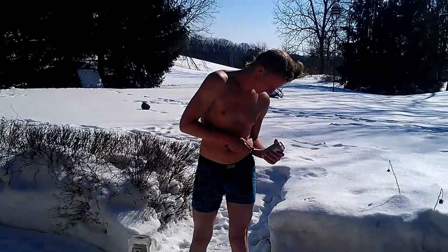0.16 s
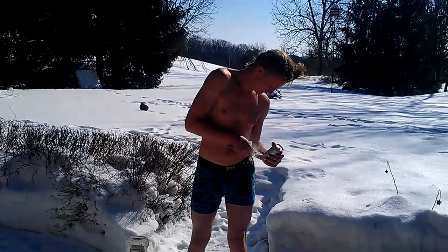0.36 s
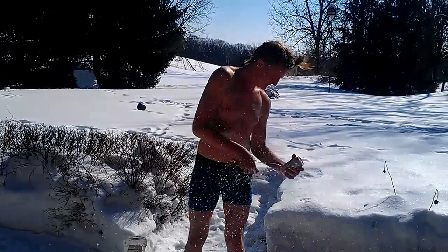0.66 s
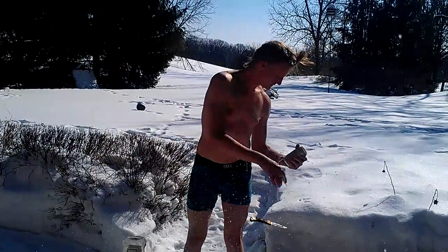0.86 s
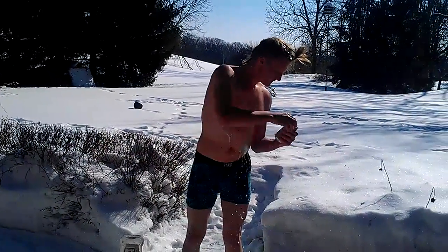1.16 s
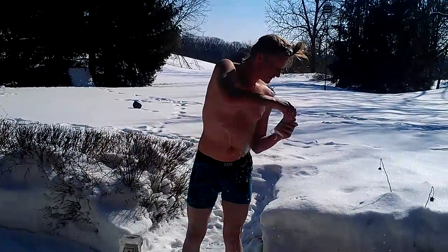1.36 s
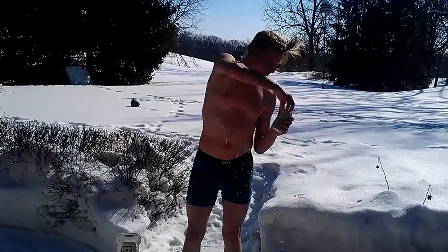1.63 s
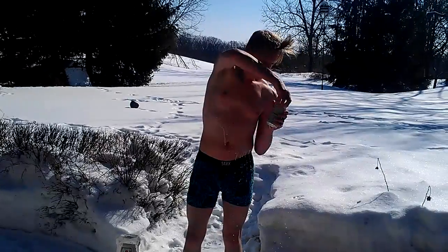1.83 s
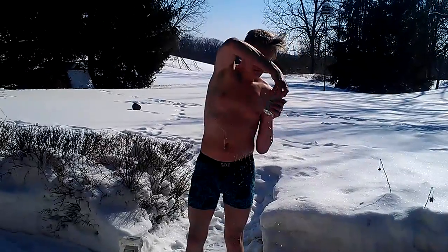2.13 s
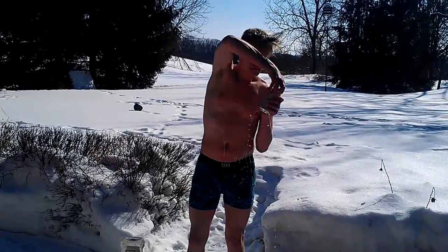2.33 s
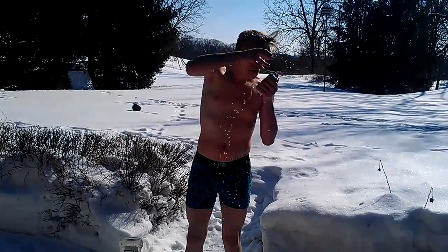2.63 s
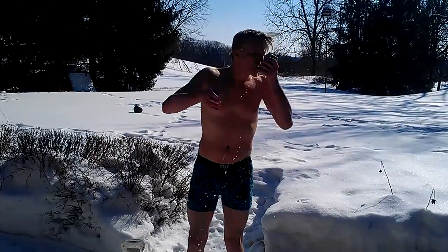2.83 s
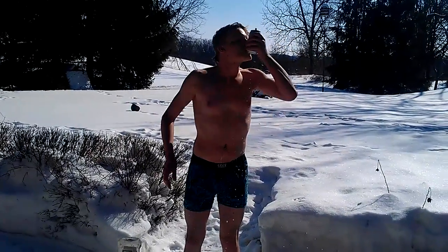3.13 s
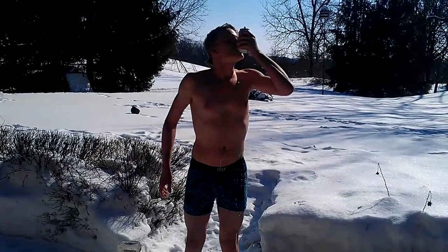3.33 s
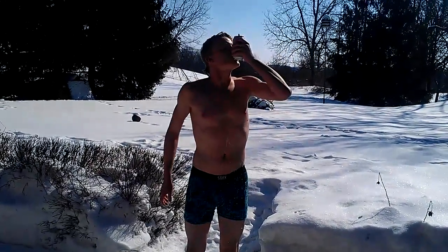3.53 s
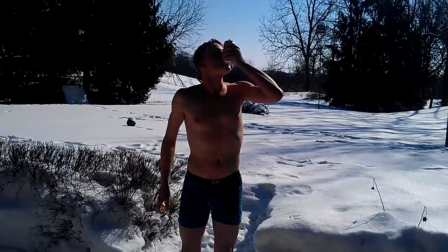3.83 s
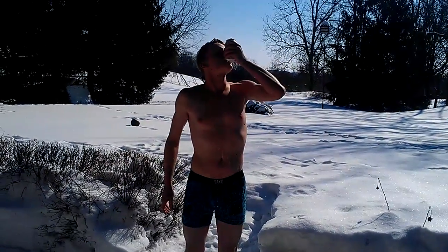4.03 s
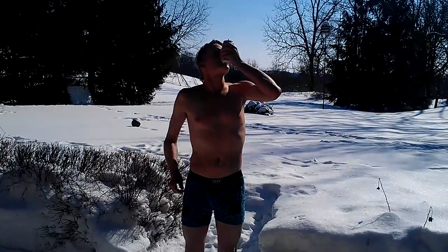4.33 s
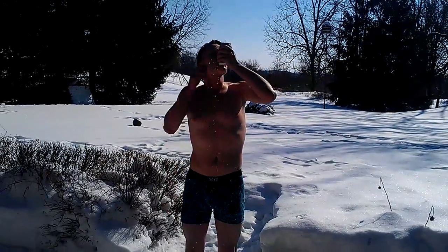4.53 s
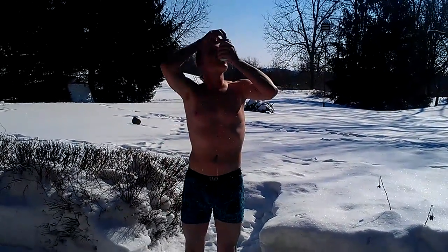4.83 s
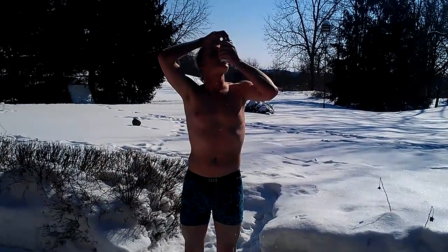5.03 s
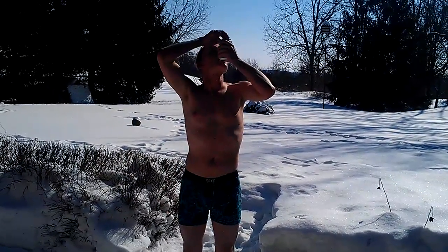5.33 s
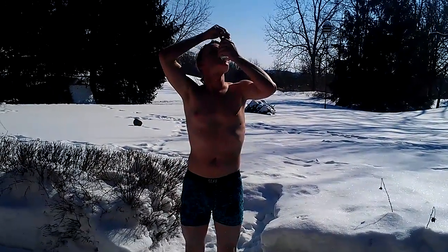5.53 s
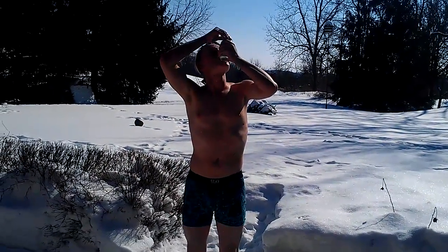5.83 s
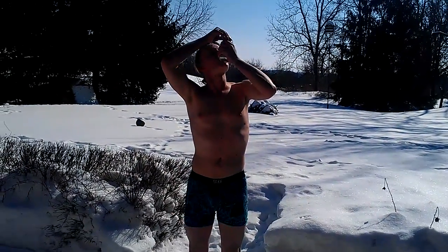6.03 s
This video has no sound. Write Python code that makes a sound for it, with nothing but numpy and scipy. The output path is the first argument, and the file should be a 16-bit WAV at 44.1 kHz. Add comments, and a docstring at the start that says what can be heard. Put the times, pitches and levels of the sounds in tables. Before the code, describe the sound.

Outdoors in the snow, meltwater splatters unevenly in a nearby metal downpipe, making it ring faintly. A drink can is pierced and spurts with two short hisses, and drops tick. Then the tab cracks open with a loud snap of gas, a brief fizz and two quick gulps of air. The thin metal creaks a few more times as it is handled. Light wind puffs against the microphone over a faint distant hum.

```python
"""Meltwater splatters in a metal downpipe close by and makes it ring, outdoors in the snow.
A drink can is pierced: its jet hisses, drops tick, and the thin wall creaks as it is handled.
Then the tab cracks open with a snap of escaping gas, and air gulps through the opening.
Light wind puffs against the microphone, and a dull hum lies far behind it all."""
import sys
import numpy as np
from scipy import signal
from scipy.fft import rfft, irfft
from scipy.io import wavfile

SR = 44100
rng = np.random.default_rng(int(sys.argv[2]) if len(sys.argv) > 2 else 0)


def store_wav(level_fs):
    """Save 16-bit WAV to argv[1]."""
    pcm = np.round(np.clip(np.atleast_2d(level_fs), -1, 1) * 32767)
    wavfile.write(sys.argv[1], SR, pcm.T.astype(np.int16))


N = 272097

# The notes the can rings at. Each row: pitch in Hz, width in Hz, level in dB.
CAN_NOTES = [(700, 100, 3.5), (850, 160, -3), (1210, 200, -11), (2035, 120, -4), (2185, 90, -4),
             (2750, 200, -10), (3160, 150, -6), (3500, 150, -6), (3880, 170, 1), (4240, 150, -3),
             (4570, 200, -9), (5700, 600, -15), (8700, 900, -16)]
# The tone of the escaping gas. Each row: frequency in Hz, level in dB.
SNAP_TONE = [(35, -45), (60, -27), (110, -32.5), (300, -11), (600, -11), (1500, -0.5), (2500, 1.5),
             (4500, -8.5), (6500, -12), (8800, -8), (12000, -13), (16000, -37)]
def can_snap(start_s=2.3848, rise_s=0.0017, hold_s=0.013):
    """The lid lets go with one kick; gas bursts out, rings the can and fades to a short sigh."""
    t = np.arange(N) / SR - start_s
    burst_db = -8.5 - 33 * (np.maximum(t - hold_s, 0) / .04) ** 1.3   # fades ever faster
    sigh_db = -42.5 - 600 * np.maximum(t - 0.1, 0)
    strength = np.clip(t / rise_s, 0, 1) * from_db(np.maximum(burst_db, sigh_db).clip(min=-200))
    gas = rng.standard_normal(N)
    burst = gas * strength
    burst[round(start_s * SR)] += from_db(18.5)   # the kick
    ringing = ring(burst, CAN_NOTES) / np.std(ring(gas, CAN_NOTES))
    rush = strength * coloured(rng.standard_normal(N), SNAP_TONE)
    return ringing + from_db(-5) * rush


# Creaks of the can. Each row: start in seconds, peak level in dB, seconds for the scrape to fade 60 dB,
# brightness in dB per octave, pitch of the bending metal in Hz.
CREAKS = [(0.386, -37, .09, 2, 2000), (1.1685, -29, 0.17, -6, 5200), (2.1384, -20, 0.17, 0, 3940),
          (2.348, -20, 0.52, 8.5, 4980), (2.497, -21.5, 0.12, -18.5, 3460),
          (2.5687, -23.5, 0.062, -4, 3000), (3.29, -32.5, 0.29, -47, 2000), (3.4047, -32.5, 0.049, 1, 3370),
          (3.4496, -39, .06, 10, 4230), (3.5407, -33, 0.066, 7, 3200), (5.226, -31, 0.12, 0, 3080),
          (5.4906, -19, 0.084, -3, 3240), (5.4982, -24, 0.12, -13, 2860)]
def can_creaks():
    """The wall and tab buckle: a crack and a short scrape ring the can's higher notes."""
    out, t = np.zeros(N), np.arange(SR // 5) / SR
    for s, db, fade_s, bright_db, hz in CREAKS:
        crack = from_db(5.5 - 60 * t / 0.0041)
        scrape = rng.standard_normal(len(t)) * (crack + from_db(-60 * t / fade_s))
        hit = ring(scrape, CAN_NOTES[3:], bright_db)
        hit += from_db(-13.5 + 0.43 * bright_db) * resonance(scrape, 4300, 3800)
        hit += from_db(-28 + 1.4 * bright_db) * resonance(scrape, 14000, 7000)   # the crack's sharp edge
        hit += from_db(4.5) * resonance(scrape, hz, 200)
        dull = signal.lfilter([.45], [1, -.55], hit)
        hit = dull + hit * from_db(-60 * t / 0.018)   # the highest notes die first
        add(out, s, from_db(db) * hit / np.abs(hit).max())
    return out


# Gulps of air. Each row: time in seconds, level in dB, pitch in Hz, rise and fall times in seconds.
AIR_GULPS = [(2.502, -31, 770, 0.0035, 0.0076), (2.577, -17, 789, 0.0024, 0.0053)]
def air_gulps():
    """Air gulps through the opening at the pitch of the air inside; liquid roughens the note."""
    out, t = np.zeros(N), np.arange(SR // 5) / SR - .04
    slosh = from_db(-11) * rms_one(resonance(rng.standard_normal(len(t)), 830, 140))
    for s, db, hz, rise_s, fall_s in AIR_GULPS:
        swell = 2 / (np.exp(-t / rise_s) + np.exp(t / fall_s))
        note = np.sin(2 * np.pi * hz * t)
        add(out, s + t[0], from_db(db) * swell * (note + slosh))
    return out


# Jets of foam and gas, one list for each. Each row: time in seconds, relative level in dB.
JETS = [
    [(.378, -68), (.400, -47), (.405, -32.5), (.432, -28.5), (.47, -38), (.53, -43), (.62, -53.5),
     (.64, -46), (.69, -71), (.72, -95)],
    [(.72, -77), (.9, -72), (1.02, -64), (1.07, -49.5), (1.13, -55.5), (1.164, -57), (1.168, -33.5),
     (1.178, -28), (1.205, -63), (1.28, -66), (1.55, -73), (1.75, -72), (2.0, -79), (2.3, -79)],
    [(2.43, -31), (2.445, -43), (2.49, -56), (2.53, -78), (2.62, -92), (2.8, -67), (3.0, -62), (3.2, -79),
     (3.45, -69.5), (3.7, -67), (3.9, -103.5)],
]
# The tone of their hiss. Each row: frequency in Hz, level in dB.
JET_TONE = [(410, -44), (700, -12), (946, -0.5), (1110, -9.5), (2130, -6.5), (2460, -12), (4260, -1.5),
            (6740, -8), (9730, -5.5), (16000, -18.5)]
def spray(spits_per_s=350, split_hz=2900):
    """The jet hisses and bubbles burst in it; the sound thins out as the jet weakens."""
    hiss = coloured(rng.standard_normal(N), JET_TONE) * from_db(2.1 * drift(200) + 0.93 * drift(9.1))
    spits = (rng.random(N) < spits_per_s / SR) * rng.standard_normal(N)
    spits *= from_db(7.9 * rng.exponential(1, N).clip(0, 4))   # a few are much louder
    hiss += from_db(-9) * rms_one(resonance(spits + 1e-18, 6000, 6000))
    jet, thin_jet = sum(level(rows) for rows in JETS), from_db(-56.5)
    treble_gain = thin_jet * (jet / thin_jet) ** 0.73   # follows the jet only in part
    low, high = filtered(hiss, split_hz, "low"), filtered(hiss, split_hz, "high")
    return from_db(-1.5) * (low * jet - high * treble_gain)


# Froth in the opened can. Each row: time in seconds, level in dB.
FROTH_LEVELS = [(2.43, -58), (2.45, -44), (2.5, -47), (2.6, -74), (2.75, -65), (2.85, -76)]
def froth():
    """Rising froth makes a duller, uneven fizz."""
    fizz = rng.standard_normal(N) * from_db(3 * drift(300))
    return level(FROTH_LEVELS) * rms_one(resonance(resonance(fizz, 2100, 3000), 2100, 3000))


# The clearest drops. Each row: start in seconds, relative level in dB.
DROPS = [(1.065, -46), (1.1273, -38), (1.3404, -41), (1.4935, -44), (1.5407, -40), (1.5586, -39),
         (1.5948, -45), (1.9714, -41.5), (1.9844, -37), (1.9944, -37.5), (2.0367, -49), (2.0692, -50),
         (2.317, -41), (2.7192, -44), (2.82, -45), (2.8897, -35), (2.9344, -38), (2.9793, -40),
         (2.9994, -40), (3.0355, -41), (3.0839, -45), (3.6506, -47), (3.6883, -36.5), (3.991, -36),
         (5.3547, -44)]
def drops(leak_start_s=1.3, leak_end_s=3.8):
    """Falling drops tick, each at a random high pitch; fainter ones join in while the can leaks."""
    out, t = np.zeros(N), np.arange(SR // 20) / SR
    faint = [(s, -51.5 + 4.5 * chance) for s, chance in scattered(leak_start_s, leak_end_s, count=24)]
    for s, db in DROPS + faint:
        hz = 5500 * np.exp(0.29 * rng.standard_normal())
        tap = rng.standard_normal(len(t)) * from_db(-60 * t / 0.011)
        tick = resonance(resonance(tap, hz, 1.1 * hz), hz, 1.1 * hz)
        add(out, s, from_db(db - 2.0) * tick / np.abs(tick).max())
    return out


# The clearest splashes. Each row: start in seconds, relative level in dB, extra treble in dB,
# hold in seconds before water_flow shortens it.
SPLASHES = [(0.0004, -32, -22, 0.059), (0.0453, -31, -24, 0.061), (0.196, -39.5, -21, .035),
            (0.2302, -23.5, -7, 0.052), (0.3836, -40, -5, .11), (0.731, -36, -9, 0.033),
            (0.9015, -30.5, 3.5, 0.061), (1.047, -38, -21, 0.032), (1.1242, -38, -2, 0.013),
            (1.209, -38, 2, 0.036), (1.2944, -43, 3, .03), (1.3854, -34.5, -2.5, 0.041),
            (1.4174, -33, -2.5, .04), (1.4915, -43.5, 3, 0.024), (1.5354, -54.5, 8, 0.043),
            (1.637, -40.5, 0, 0.058), (1.696, -34, -7.5, 0.009), (1.841, -47, -2, 0.076),
            (2.028, -47, 5.5, 0.02), (2.102, -45, -11, 0.1), (2.178, -35, -6, .05),
            (2.3283, -32.5, -6, 0.11), (2.447, -33.5, 4, 0.11), (2.673, -33, -22, 0.082),
            (2.9784, -31, -6, .005), (3.085, -47, 8.5, 0.14), (3.1616, -35.5, -9, 0.096),
            (3.289, -32.5, -3.5, .06), (3.4025, -33.5, -0.5, 0.039), (3.449, -31.5, -4.5, 0.11),
            (3.537, -31, 0, 0.068), (3.722, -36.5, -4, 0.049), (3.85, -42, -5, .025),
            (3.9865, -36, -8.5, 0.12), (4.114, -39, -4, 0.098), (4.2504, -34, -4, 0.073),
            (4.33, -34, -7, 0.026), (4.396, -33, -7, 0.085), (4.4505, -36, -4.5, 0.078),
            (4.563, -38, -6.5, 0.066), (4.663, -39.5, -6, 0.043), (4.7999, -40, -6.5, 0.13),
            (4.9024, -37.5, -8, .03), (4.941, -38.5, -5, 0.078), (5.1163, -33.5, -11, 0.1),
            (5.222, -34, 0, 0.084), (5.3847, -37, -16, 0.074), (5.4346, -34.5, -3.5, 0.017),
            (5.529, -32, -5, 0.067), (5.61, -36.5, -1.5, 0.14), (5.7123, -40, -3.5, 0.021),
            (5.8225, -37.5, -6.5, 0.056), (5.897, -34.5, -6.5, 0.072), (6.0195, -37.5, -14, .06)]
# The steady run of water. Each row: time in seconds, level in dB.
TRICKLE_LEVELS = [(0.0, -47.5), (0.2, -57), (0.8, -60), (1.2, -52), (1.5, -63), (2.25, -57), (2.56, -45.5),
                  (2.8, -52.5), (4.3, -59), (5.05, -62.5), (5.55, -50), (5.8, -64.5), (6.17, -56.5)]
# The lower and the higher part of the splash's tone. Each row: frequency in Hz, level in dB.
PIPE_LOW_TONE = [(900, -26.5), (1150, -7.5), (1260, 3), (1700, 0), (2500, -5.5), (2800, -14.5), (4000, -9),
                 (7000, -52)]
PIPE_HIGH_TONE = [(2000, -30), (2800, -2), (3500, 1), (4300, -6.5), (4700, -5), (6400, -13), (7000, -30),
                  (11000, -26), (15500, -40.5)]
# The notes the pipe rings at. Each row: pitch in Hz, width in Hz, level in dB.
PIPE_NOTES = [(1261, 12, 0), (1400, 47, -10), (1500, 100, -15), (1652, 16, 4.5), (2159, 11, -1),
              (2287, 47, -7), (2520, 35, -7), (3160, 35, -5.5), (3990, 5, -11)]
def downpipe():
    """Lumps of water burst into droplets; the pipe rings and holds back sound below its lowest note."""
    dribbles = [(s, -43 + 2.5 * chance, -1.5, 0.032) for s, chance in scattered(0, N / SR, count=24)]
    s, db, treble_db, hold = np.transpose(SPLASHES + dribbles)
    trickle = level(TRICKLE_LEVELS)
    low = water_flow(trickle, s, db - 15.5, hold, time_scale=0.66)
    # High notes leave the pipe first.
    high = water_flow(from_db(-5) * trickle, s, db + treble_db - 14.0, hold, time_scale=0.4)
    droplets = rng.standard_normal((2, N)) * from_db(2.4 * drift(400))
    splash = low * coloured(droplets[0], PIPE_LOW_TONE) + high * coloured(droplets[1], PIPE_HIGH_TONE)
    ringing = ring(low * droplets[1], PIPE_NOTES) / np.std(ring(droplets[1], PIPE_NOTES))
    return splash + from_db(0.5) * ringing


def water_flow(trickle, times, levels_db, holds, time_scale):
    """Loudness over time: each lump of water lands with a blow, holds, then thins out to the trickle."""
    t, power = np.arange(SR // 2) / SR, trickle ** 2
    blow = 1 + from_db(-5.5 - 60 * t / 0.084)
    for s, db, hold in zip(times, levels_db, holds):
        fade_db = 60 * np.maximum(t - time_scale * hold, 0) / (time_scale * .28)
        add(power, s, (blow * from_db(db - fade_db)) ** 2)
    return np.sqrt(power)


# Gusts of wind. Each row: time in seconds, relative level in dB.
GUSTS = [(0.0, -49.5), (0.06, -44), (0.17, -52.5), (0.4, -55.5), (0.54, -50), (0.67, -63), (0.8, -88),
         (0.92, -61), (1.06, -48.5), (1.2, -46), (1.27, -52.5), (1.34, -41.5), (1.4, -42.5), (1.47, -58.5),
         (1.69, -50), (1.85, -51.5), (1.92, -75), (2.4, -69), (2.5, -57), (2.56, -34.5), (2.7, -43),
         (2.82, -56), (2.87, -47), (3.16, -54), (3.24, -43.5), (3.42, -49.5), (3.51, -35), (3.55, -59),
         (3.76, -60), (3.92, -52), (4.05, -59), (4.3, -65.5), (5.1, -78), (5.45, -63), (5.8, -81),
         (5.92, -55.5), (6.17, -84)]
# The tone of the gusts. Each row: frequency in Hz, level in dB.
GUST_TONE = [(24, -63), (40, -35), (254, -1.5), (504, -7), (633, -12), (877, -5.5), (1090, -26.5),
             (1200, -32.5), (1560, -49), (2640, -120)]
# The strongest puffs. Each row: time of the peak in seconds, relative level in dB, pitch in Hz.
PUFFS = [(0.0617, -33, 420), (0.1788, -31.5, 328), (0.2641, -32, 520), (0.5098, -31, 430),
         (0.5373, -29.5, 415), (1.0619, -27, 338), (1.122, -33, 366), (1.164, -26.5, 355),
         (1.1767, -21.5, 860), (1.1897, -26, 395), (1.3319, -26, 346), (1.343, -23, 560),
         (1.3596, -28, 351), (1.3875, -13.5, 740), (1.399, -25.5, 347), (1.5858, -33.5, 364),
         (1.6405, -29.5, 510), (1.676, -28, 377), (1.6898, -29.5, 360), (1.7765, -26, 403),
         (1.818, -33.5, 400), (1.8423, -30.5, 373), (2.563, -20, 490), (2.6189, -18, 510),
         (2.652, -24, 355), (2.679, -25, 320), (2.6909, -23, 496), (2.8609, -28.5, 660), (2.877, -32, 590),
         (2.9746, -28, 960), (2.9846, -30, 790), (3.2027, -28, 397), (3.2328, -25, 357),
         (3.2923, -27.5, 790), (3.3686, -31, 672), (3.4376, -23.5, 384), (3.482, -21, 550),
         (3.5068, -18, 383), (3.66, -44.5, 260), (3.72, -43, 300), (3.9196, -36, 332), (3.94, -36, 260),
         (5.015, -55, 200), (5.03, -50, 256), (5.18, -39, 454), (5.285, -54, 230), (5.435, -41.5, 350),
         (5.457, -43.5, 264), (5.55, -43, 242), (5.925, -44, 300)]
def wind(swirl_hz=410, roughness=0.22):
    """Gusts make a lumpy, low noise; each swirl that hits the microphone is a puff sinking in pitch."""
    lumps = rms_one(rng.standard_normal(N) * from_db(4.0 * drift(46)))
    out = from_db(-1.0) * level(GUSTS) * coloured(lumps, GUST_TONE)
    t = (np.arange(SR // 25) - SR // 50) / SR
    puffs = list(PUFFS)
    for s, chance in scattered(0, N / SR, count=110):   # weaker puffs that follow the gusts
        gust_db = np.interp(s, *np.transpose(GUSTS))
        puffs.append((s, gust_db + 2.5 + 0.5 * chance, swirl_hz * np.exp(.2 * rng.standard_normal())))
    for (s, db, hz), phase in zip(puffs, rng.random(len(puffs))):
        cycles = t * hz
        swell = np.exp(-(cycles / np.where(t < 0, .8, 1.3)) ** 2)
        note = np.sin(2 * np.pi * (cycles - 0.11 * cycles ** 2 + phase))
        flutter = rms_one(filtered(rng.standard_normal(len(t)), [hz / 2, 2 * hz], "band", order=4))
        add(out, s + t[0], from_db(db - 4.0) * swell * (note + roughness * flutter))
    return out


# The tone of the background. Each row: frequency in Hz, level in dB.
HUM_TONE = [(60, -49.5), (120, -36.5), (250, -8.5), (450, 1.5), (780, 3.5), (1050, -1), (1600, -20),
            (3800, -31.5), (7000, -21.5), (10000, -22), (14800, -44), (16000, -59)]
def far_hum(level_db=-58):
    """Smooth distant noise and the microphone's own hiss, with a murmur that comes and goes."""
    steady = from_db(drift(1.0)) * coloured(rng.standard_normal(N), HUM_TONE)
    murmur = from_db(-9.5 + 3.3 * drift(11)) * rms_one(resonance(rng.standard_normal(N), 760, 180))
    return from_db(level_db) * (steady + murmur)


def from_db(db):
    """Turn decibels into a gain, the number a sound is multiplied by."""
    return 10 ** (np.asarray(db) / 20)


def rms_one(x):
    """Scale a sound to an average strength (rms) of 1."""
    return x / np.sqrt(np.mean(x ** 2) + 1e-20)


def level(rows):
    """Gain over time from rows of seconds and dB, silent outside them."""
    s, db = np.transpose(rows)
    return from_db(np.interp(np.arange(N) / SR, s, db, left=-200, right=-200))


def coloured(x, tone):
    """Give a sound the tone in rows of Hz and dB, at strength 1."""
    hz, db = np.transpose(tone)
    grid = np.arange(1, N // 2 + 2) * SR / N
    gains = from_db(np.interp(np.log(grid), np.log(hz), db))
    return rms_one(irfft(rfft(x) * gains, N))


def drift(rate_hz):
    """A smooth random wobble of strength 1."""
    r = np.exp(-2 * np.pi * rate_hz / SR)
    return rms_one(signal.lfilter([1], [1, -2 * r, r * r], rng.standard_normal(N + SR))[SR:])


def filtered(x, hz, kind, order=2):
    """Keep the lows, the highs or a band in between."""
    return signal.sosfilt(signal.butter(order, hz, kind, fs=SR, output="sos"), x)


def resonance(x, hz, width):
    """Ring at one pitch; a smaller width rings longer."""
    r = np.exp(-np.pi * width / SR)
    feedback = [1, -2 * r * np.cos(2 * np.pi * hz / SR), r * r]
    return signal.lfilter((1 - r * r) / 2 * np.array([1, 0, -1]), feedback, x)


def ring(x, notes, tilt_db=0):
    """Ring at several notes, every other one flipped; the tilt brightens them in dB per octave."""
    return sum((-1) ** k * from_db(db + tilt_db * np.log2(hz / 3000)) * resonance(x, hz, width)
               for k, (hz, width, db) in enumerate(notes))


def add(out, s, x):
    """Mix a short sound in at s seconds."""
    at = max(round(s * SR), 0)
    out[at:at + len(x)] += x[:N - at]


def scattered(start, end, count):
    """Random times, each paired with a random number around 0."""
    return zip(rng.uniform(start, end, count), rng.standard_normal(count))


def scene():
    """Add all the sounds into one channel."""
    meltwater = downpipe()
    can = spray() + froth() + can_creaks() + can_snap() + air_gulps()
    return (meltwater + can + drops() + wind() + far_hum())[None]


def record(dry, low_cut_hz=110, high_cut_hz=16700):
    """Round off the loudest peaks, then cut the bass and the very top."""
    rounded = .67 * np.tanh(dry / .67)
    thin = filtered(rounded, low_cut_hz, "high")
    return signal.sosfilt(signal.cheby2(12, 70, high_cut_hz, fs=SR, output="sos"), thin)


dry = scene()
out = record(dry)
store_wav(out)
```